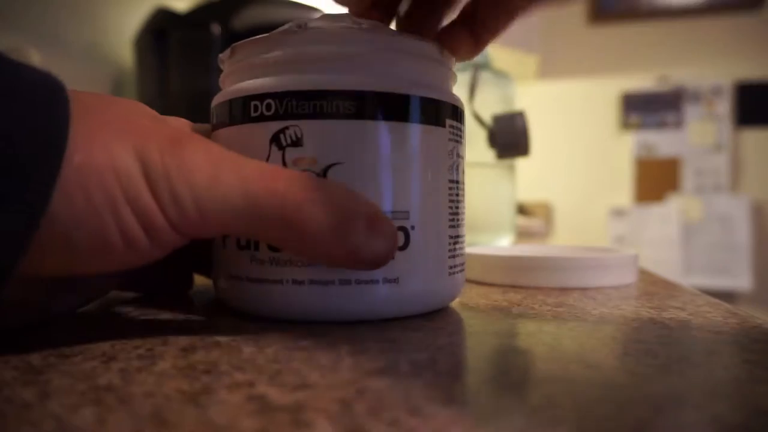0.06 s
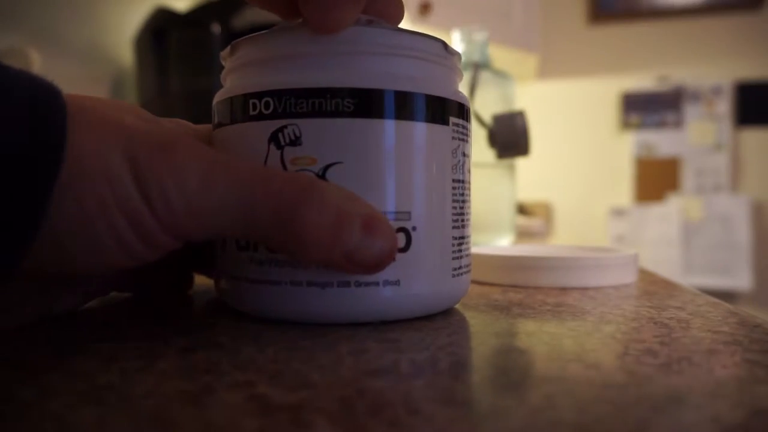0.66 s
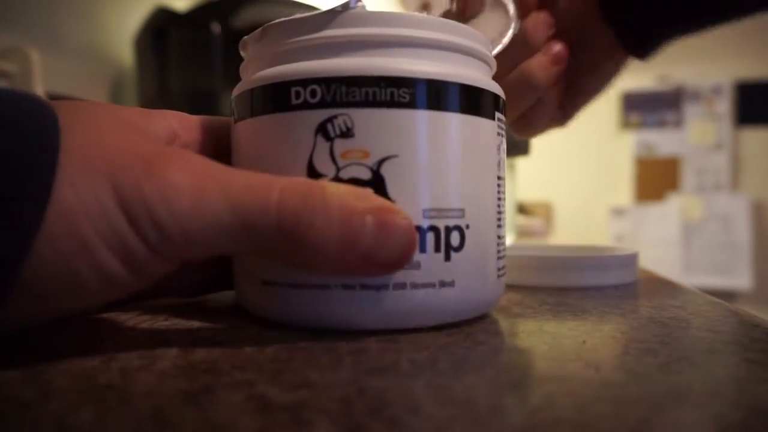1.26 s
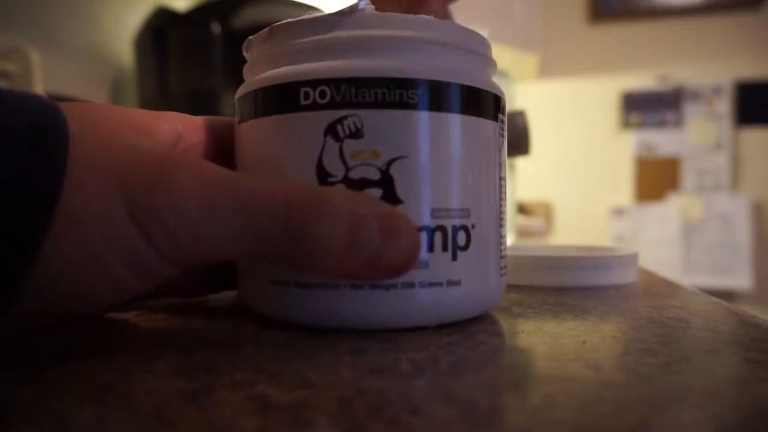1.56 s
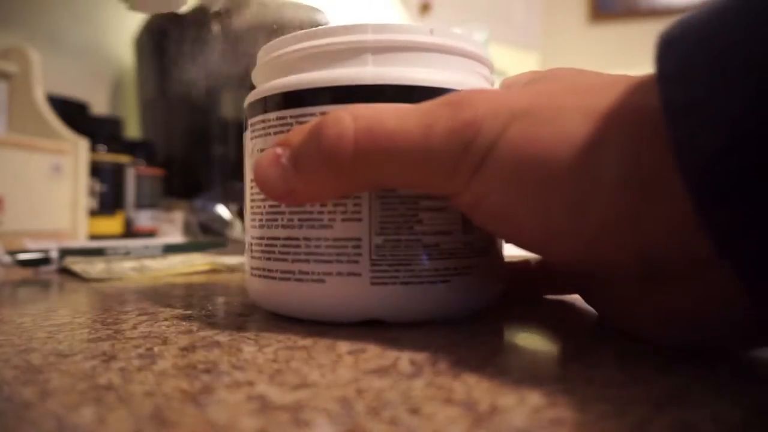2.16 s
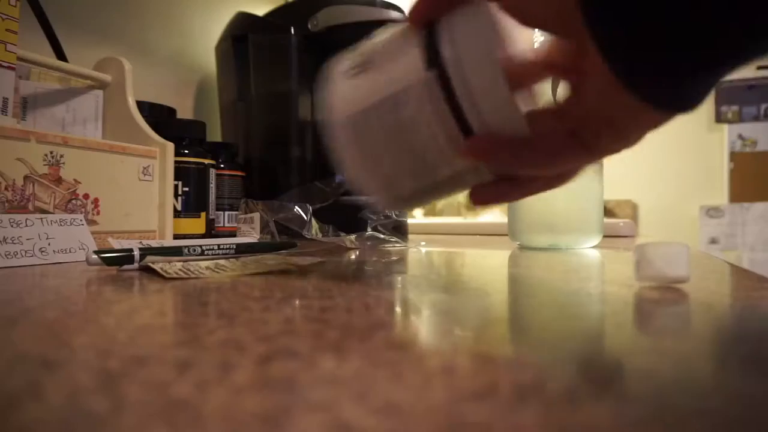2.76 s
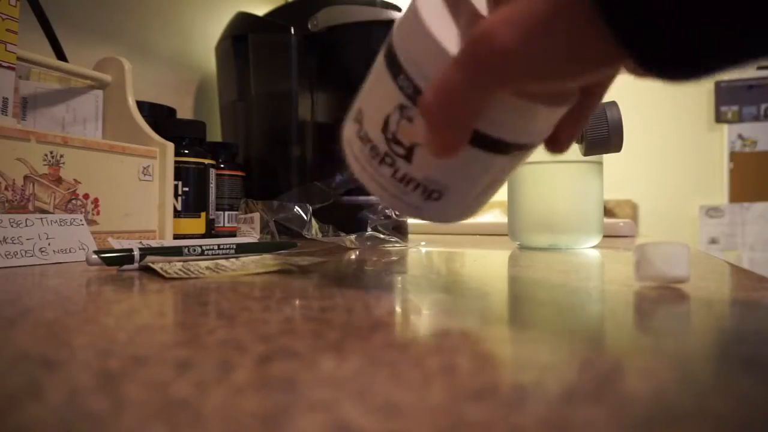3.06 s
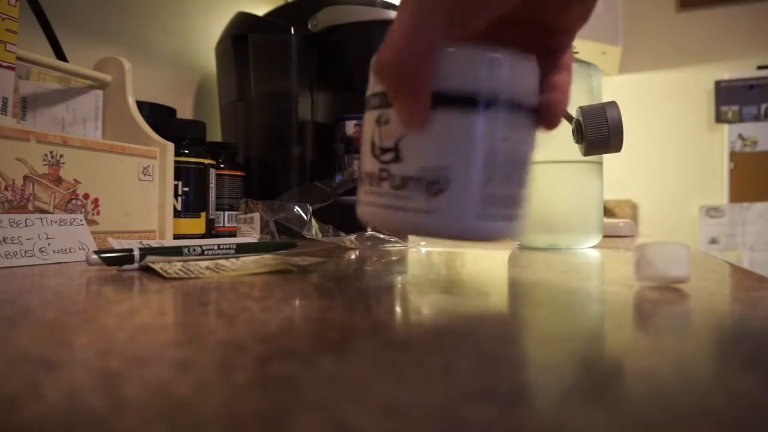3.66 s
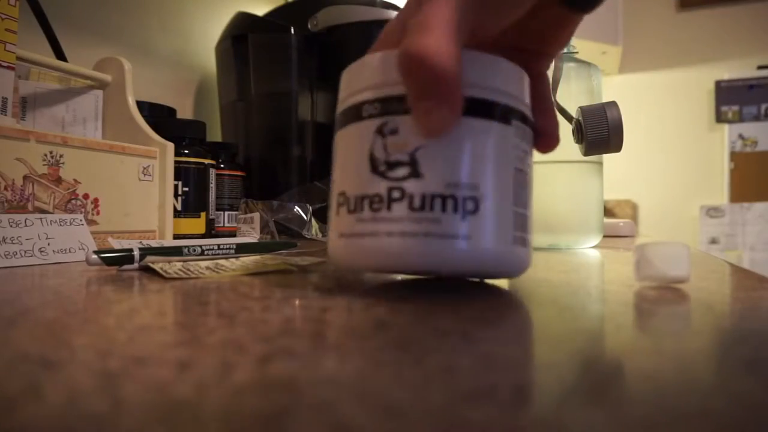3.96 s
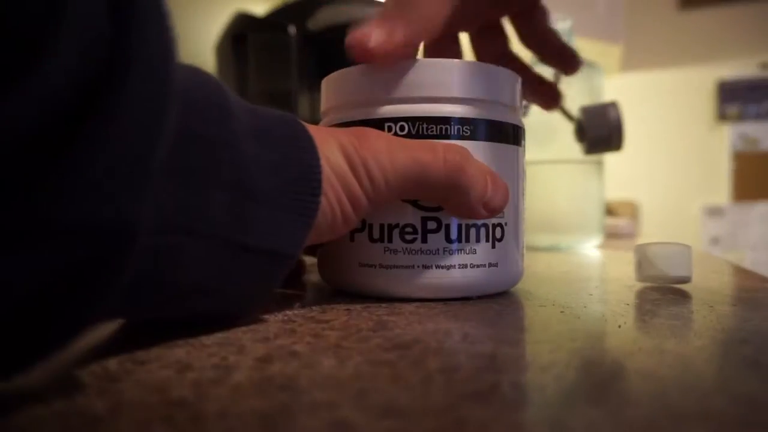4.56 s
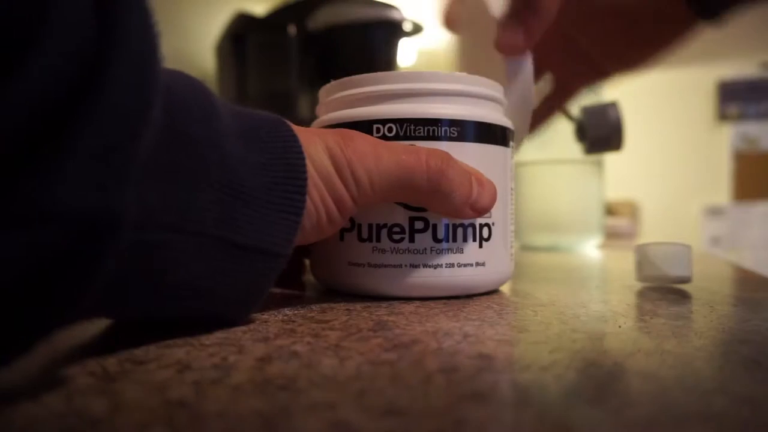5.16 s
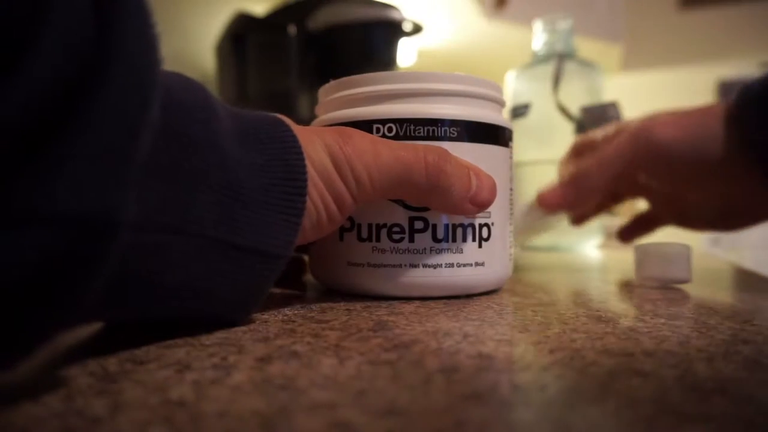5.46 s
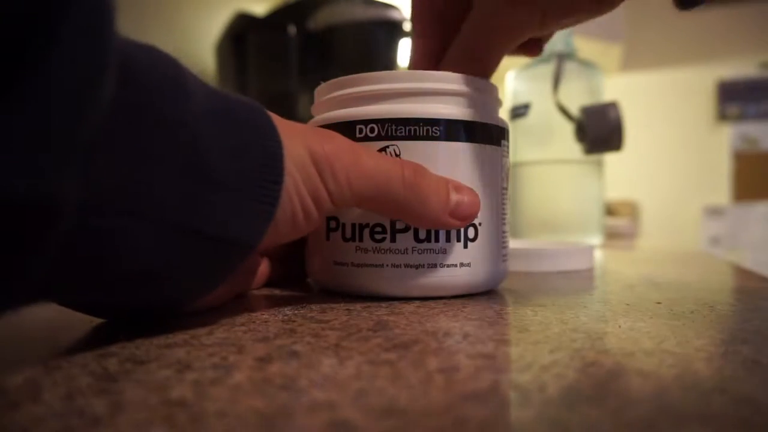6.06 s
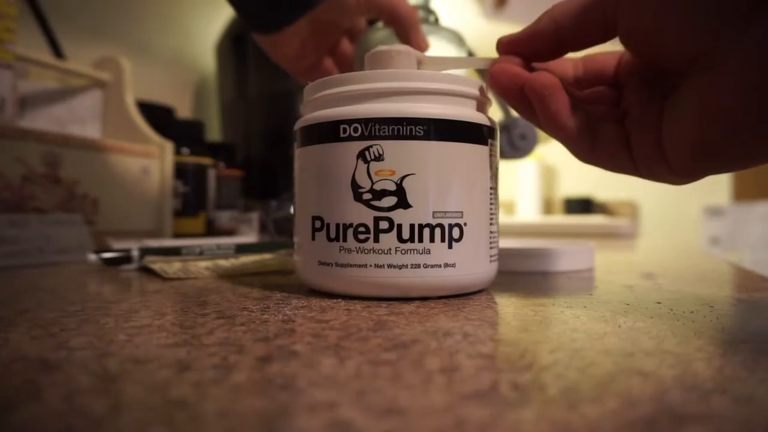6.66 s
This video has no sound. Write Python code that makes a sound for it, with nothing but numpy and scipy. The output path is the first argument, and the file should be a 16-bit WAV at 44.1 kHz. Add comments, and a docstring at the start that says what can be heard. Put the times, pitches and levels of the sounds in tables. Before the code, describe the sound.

Close handling of a plastic powder tub: seal peeling, swishing shakes, hollow thumps and a lid unscrewed and dropped, over a faint fridge hum.

```python
"""Opening a tub of powder

A plastic tub is handled close by on a kitchen counter while a fridge hums and a sleeve brushes faintly.
Its seal creaks by stick-slip, peels and pops off; the tub is shaken and set down; the lid is unscrewed
and clatters onto the counter; fingers dig for the scoop, and the tub thumps down twice. Impacts excite
damped modes of the plastic; tearing, rubbing and sliding powder are dense trains of tiny impulses."""
import sys
import numpy as np
from scipy import signal
from scipy.fft import rfft, irfft, next_fast_len
from scipy.io import wavfile

SR = 44100
rng = np.random.default_rng(int(sys.argv[2]) if len(sys.argv) > 2 else 0)


def dump(signal):
    """Clip the signal to [-1, 1] and save it as 16-bit WAV at the path in sys.argv[1]."""
    limited = np.clip(np.atleast_2d(signal).T, -1, 1)
    pcm = np.round(limited * 32767).astype(np.int16)
    wavfile.write(sys.argv[1], SR, pcm)


N = 304731
TIME = np.arange(N) / SR
BRIEF = TIME[:8192]  # time axis of one short sound

# Tones of the fridge motor. Each row: frequency in Hz, median rms level in dB.
MOTOR_TONES = [(59, -58.5), (118.6, -60.5), (355.5, -56.5), (558, -61.5)]
# Spectra of the fan and of brushed cloth. Each row: frequency in Hz, gain in dB.
FAN_SPECTRUM = [(25, -22), (80, 0), (170, -4.5), (300, 5), (720, -1), (950, -12.5), (1700, -22),
                (2500, -29.5), (16000, -37.5)]
CLOTH_SPECTRUM = [(400, -2.5), (1400, 8.5), (3500, -4), (16000, -14.5)]
# Movements of the sleeve. Each row: start in seconds, hold in seconds, level in dB.
SLEEVE_MOVES = [(.05, 1.4, -59.5), (4.15, 1.19, -61), (6.45, 0.54, -64)]

# Modes of the tub's hollow body and of its wall, before each blow scales them.
# Each row: frequency in Hz, 60 dB decay time in seconds, relative level in dB.
BODY_MODES = [(299, 0.029, 5.5), (358.5, 0.067, 3), (443, 0.021, 2.5), (570.4, 0.058, 0),
              (670.5, 0.056, -3.5), (798, 0.019, 5)]
WALL_MODES = [(650, .025, 9.8), (1042, 0.035, 19.5), (1218, 0.039, 11), (1337, 0.05, 9.2),
              (1670, 0.036, 6.4), (1983, 0.034, 6), (2340, 0.015, 1.6)]
# Spectra of a hard contact and of the plastic denting. Each row: frequency in Hz, gain in dB.
CRACK_SPECTRUM = [(500, 2), (1500, 6), (3700, 3), (6400, -5), (8000, -6.5), (16000, -7.5)]
DENT_SPECTRUM = [(100, -6), (700, 4), (2200, -5.5), (3500, -20), (16000, -42.5)]
# The tub lands. Each row: start in seconds, body, wall, crack and dent levels in dB, wall pitch factor,
# the base note's frequency in Hz, level in dB and swell in seconds, the counter's level in dB.
TUB_LANDINGS = [(0.073, -27.5, -25.5, -37, -27.5, 0.85, 144.5, -17.5, 0.0056, -39),
                (1.278, -32.5, -49, -56, -45.5, 1.14, 136.5, -33, .012, -49),
                (3.964, -22, -35, -32, -25.5, 1.85, 150, -20.5, 0.0064, -36),
                (4.1379, -18, -31, -36, -26.5, 1.7, 149, -22.5, 0.006, -25),
                (6.4335, -24.5, -32.5, -56, -39.5, 1.113, 170.2, -14, 0.0095, -26.5),
                (6.604, -27.5, -29.5, -64, -38, 1.1, 162.3, -13.5, 0.0087, -31)]
# Fingers tap. Each row: start in seconds, body, wall, crack and dent levels in dB, wall pitch factor.
FINGER_TAPS = [(.2613, -34.5, -27.5, -49, -39, 1.3), (2.0979, -23, -27, -29, -30, .82),
               (4.4832, -32.5, -37, -55, -44.5, 0.95), (4.5439, -20, -38, -37, -26, 1.15),
               (4.629, -34.5, -38.5, -42.5, -39, 0.95), (4.911, -25, -40, -43, -36, 0.99),
               (5.831, -40.5, -49, -55, -41.5, 1.05)]
# The thread jolts the tub. Each row: start in seconds, body and wall levels in dB, wall pitch factor.
THREAD_JOLTS = [(4.704, -31, -30, 1.12), (4.7249, -33, -34.5, 1.15), (4.7485, -27, -38, 0.99),
                (4.7665, -28.5, -33.5, 1.9), (5.0049, -29, -35, 1.54), (5.032, -33, -41, 1.13)]

# Runs of stick-slip under the fingers, one list a run.
# Each row: time in seconds, slips per second, relative level in dB, ringing frequency in Hz.
CREAK_RUNS = [
    [(.6015, 71.5, -25.5, 660), (.66, 104, -20, 900), (.735, 81, -15, 900)],
    [(.7522, 69, -17.5, 880), (.805, 146, -27, 970)],
    [(.8682, 72, -17, 1160), (.9, 97, -25, 1180), (.952, 46, -24.5, 1050)],
    [(5.739, 102, -40, 940), (5.82, 69, -43, 1010)],
]
# Spectra of a slip's tick, the drumming seal and tearing glue. Each row: frequency in Hz, gain in dB.
TICK_SPECTRUM = [(1000, 2.5), (5000, 3), (16000, -9)]
MEMBRANE_SPECTRUM = [(150, -11.5), (340, 3.5), (660, -2.5), (810, 13.5), (960, -2.5), (2600, -10.5),
                     (4000, -19.5)]
TEAR_SPECTRUM = [(1500, 3), (3500, 11), (11000, 2), (16000, -4.5)]
# Tugs at the seal. Each row: start in seconds, hold in seconds, level in dB.
SEAL_TUGS = [(.95, 0.097, -41.5), (1.06, 0.029, -40), (1.205, 0.047, -44.5), (1.37, 0.038, -48.5),
             (1.555, 0.16, -38.5), (1.855, 0.013, -43), (1.95, 0.065, -42.5), (2.122, 0.012, -41.5)]
# Sudden rips. Each row: start in seconds, hold in seconds, drumming and tearing levels in dB.
SEAL_RIPS = [(1.051, 0.0015, -33.5, -33), (1.191, 0.0026, -43, -44.5), (1.723, 0.004, -33.5, -34.5),
             (1.735, 0.0031, -31.5, -53), (2.6405, 0.00097, -38, -42), (2.651, 0.022, -36.5, -44.5)]
# The seal buckles. Each row: start in seconds, level in dB.
SEAL_BUCKLES = [(1.261, -45.5), (1.988, -37)]

# Strokes of the shaken tub. Each row: start in seconds, relative level in dB.
SHAKE_STROKES = [(2.796, -35), (2.86, -36.5), (2.943, -38.5), (3.02, -38.5), (3.09, -46), (3.214, -39),
                 (3.285, -43.5), (3.361, -40.5), (3.445, -39), (3.52, -37.5), (3.595, -40), (3.681, -39.5),
                 (3.753, -39.5), (3.822, -38), (3.893, -43.5)]
# Spectra of sliding powder and of its fast swish. Each row: frequency in Hz, gain in dB.
POWDER_SPECTRUM = [(1400, 0), (2000, 4.5), (3500, 2.5), (16000, 2.5)]
SWISH_SPECTRUM = [(3000, -19), (6600, -3), (16000, -9)]
# The scoop bumps the wall. Each row: start in seconds, relative level in dB, wall pitch factor.
SCOOP_BUMPS = [(3.041, -37, 1.58), (3.207, -46, 2.3)]

# Twists of the lid. Each row: start in seconds, hold in seconds, level in dB.
LID_TWISTS = [(4.43, 0.053, -45), (4.684, 0.012, -37.5), (4.71, 0.034, -31), (4.79, 0.032, -38),
              (4.952, 0.0055, -37.5), (4.986, 0.0067, -34), (5.185, 0.023, -47.5)]
# Spectra of the thread's catches and of its hiss. Each row: frequency in Hz, gain in dB.
THREAD_SPECTRUM = [(150, -16), (361, 12), (480, -0.5), (635, 8), (800, -9), (1200, 2.5), (1600, -8),
                   (2300, -2), (3200, -27)]
HISS_SPECTRUM = [(2000, 7.5), (3500, -1), (5100, 5.5), (8500, -5.5)]
# Modes of the lid. Each row: frequency in Hz, relative level in dB.
LID_MODES = [(1190, -3), (1860, 8), (2150, 1.5), (2900, 1), (3550, -4), (4900, 6), (5260, 6.5), (6100, 2.5),
             (6770, 3), (11600, -11)]
# Modes of its free rim. Each row: frequency in Hz, 60 dB decay time in seconds, relative level in dB.
RIM_MODES = [(1810, .09, -7.5), (2060, 0.043, -0.5), (2210, 0.026, -1)]
# The lid strikes the counter. Each row: start in seconds, level, treble gain and rim level in dB.
LID_CLACKS = [(5.5219, -26.5, -6.5, -26.5), (5.53, -36, -12, -34.5), (5.5838, -24, 4, -39),
              (5.592, -34.5, 4, -38), (5.645, -35, -2, -50), (5.6532, -30.5, 1, -48), (5.66, -35.5, 1, -47)]
# It skids between clacks. Each row: start and hold in seconds, level, treble gain and rim level in dB.
LID_SKIDS = [(5.524, 0.06, -41, 4, -37), (5.581, 0.086, -37.5, 7, -47)]

# Fingers push into the powder. Each row: start in seconds, hold in seconds, relative level in dB.
FINGER_DIGS = [(6.16, 0.017, -51.5), (6.2, 0.027, -44.5), (6.238, 0.0044, -35.5), (6.332, 0.0022, -45.5),
               (6.5, 0.34, -41.5)]
# Spectrum of pressed powder. Each row: frequency in Hz, gain in dB.
CRUNCH_SPECTRUM = [(300, 1), (1250, 4.5), (4500, -17), (16000, -26)]

# Spectra of the echo, of side relative to mid, and of left relative to right.
# Each row: frequency in Hz, gain in dB.
ECHO_SPECTRUM = [(60, -7), (350, -8), (650, -12.5), (1400, -14.5), (6000, -13)]
SIDE_SPECTRUM = [(100, -27), (600, -11.5), (1100, -3.5), (2000, -0.5), (16000, -0.5)]
LEFT_OVER_RIGHT = [(400, -0.1), (1100, -3.5), (14000, -1)]


def amp(db):
    """Amplitude grows tenfold for every 20 dB."""
    return 10 ** (np.asarray(db) / 20)


def unit(x):
    """Normalisation to an rms of 1."""
    return x / np.sqrt(np.mean(x ** 2))


def attack_unit(x):
    """Normalisation to an rms of 1 over the first 10 ms."""
    return x / np.sqrt(np.mean(x[:SR // 100] ** 2))


def add(track, s, sound):
    """Superposition: a short sound joins the track at s seconds."""
    i = int(s * SR)
    track[i:i + len(sound)] += sound[:N - i]


def colour(x, points):
    """Minimum-phase filtering: a folded cepstrum gives a causal response with the (Hz, dB) spectrum."""
    size = 2 * next_fast_len(len(x), real=True)
    hz, db = np.transpose(points)
    bins = np.maximum(np.arange(size // 2 + 1) * SR / size, 1)
    cepstrum = irfft(np.log(amp(np.interp(np.log(bins), np.log(hz), db))))
    cepstrum[1:size // 2] *= 2
    cepstrum[size // 2 + 1:] = 0
    return irfft(rfft(x, size) * np.exp(rfft(cepstrum)))[:len(x)]


def fade(t60, t=BRIEF):
    """Exponential decay by 60 dB in t60 seconds."""
    return np.exp(-np.log(1000) * t / t60)


def ring(modes, pitch=1, length=1, scatter=0.019):
    """Free vibration is a sum of damped modes; each blow lands elsewhere, so they shift a little."""
    out = 0
    for k, (hz, t60, db) in enumerate(modes):
        shifted_hz = hz * pitch * (1 + scatter * rng.standard_normal())
        out += amp(db) * (-1) ** k * fade(t60 * length) * np.sin(2 * np.pi * shifted_hz * BRIEF)
    return out


def pulse(points):
    """Impulse response: one dead pulse with a (Hz, dB) spectrum."""
    return attack_unit(colour(signal.unit_impulse(len(BRIEF)), points))


def grains(per_s, spread_db):
    """Shot noise: independent tiny clicks of unequal size."""
    size_db = spread_db * np.minimum(rng.exponential(size=N), 4)
    return (rng.random(N) < per_s / SR) * rng.standard_normal(N) * amp(size_db)


def gestures(rows, rise_db_per_s, sag_db_per_s, fall_db_per_s):
    """Incoherent powers add: each movement rises to its start time, sags while held, then falls."""
    power = np.zeros(N)
    for s, hold, db in rows:
        span = slice(*np.searchsorted(TIME, [s - 60 / rise_db_per_s, s + hold + 60 / fall_db_per_s]))
        age = TIME[span] - s
        drop_db = rise_db_per_s * np.maximum(-age, 0) + sag_db_per_s * np.maximum(age, 0)
        drop_db += fall_db_per_s * np.maximum(age - hold, 0)
        power[span] += amp(db - drop_db) ** 2
    return np.sqrt(power)


def bloom(swell_s):
    """A Rayleigh envelope peaks after the swell time and dies about as fast."""
    age = BRIEF / swell_s
    return age * np.exp((1 - age ** 2) / 2)


def fridge():
    """Slow modulation of level and phase makes the motor tones waver over a fan's broadband rush."""
    fan, other_fan = (colour(rng.standard_normal(N), FAN_SPECTRUM) for _ in range(2))
    mid, side = unit(fan), colour(other_fan, SIDE_SPECTRUM) / np.std(fan)
    hum, knots = 0, np.arange(0, TIME[-1] + 1, .3)
    for hz, db in MOTOR_TONES:
        size, phase = (np.interp(TIME, knots, rng.standard_normal(len(knots))) for _ in range(2))
        hum += amp(db + 2 * size) * np.sqrt(2) * np.sin(2 * np.pi * hz * TIME + 1.44 * phase)
    return amp(-47.5) * np.array([mid + side, mid - side]) + hum


def sleeve():
    """Friction between cloth fibres makes faint noise while the arm moves."""
    motion = gestures(SLEEVE_MOVES, rise_db_per_s=200, sag_db_per_s=1, fall_db_per_s=192)
    return motion * unit(colour(grains(per_s=8100, spread_db=3.5), CLOTH_SPECTRUM))


def crack(t60):
    """Hard contact is brief and therefore broadband: a snap of decaying noise."""
    return attack_unit(colour(rng.standard_normal(len(BRIEF)) * fade(t60), CRACK_SPECTRUM))


def blow(body_db, wall_db, crack_db, dent_db, body_pitch=1, wall_pitch=1):
    """An impact dents the plastic and excites its modes; a soft one reaches only the low wall modes."""
    body = amp(body_db) * attack_unit(ring(BODY_MODES, body_pitch, 1 / body_pitch))
    soft_hz, hard_hz, crack_db_per_octave = 1820, 7900, 14
    reach_hz = np.clip(hard_hz * 2 ** ((crack_db - wall_db) / crack_db_per_octave), soft_hz, hard_hz)
    contact = signal.butter(2, reach_hz, fs=SR, output="sos")
    wall = attack_unit(signal.sosfilt(contact, ring(WALL_MODES, wall_pitch, .75 / wall_pitch)))
    return body + amp(wall_db) * wall + amp(dent_db) * pulse(DENT_SPECTRUM) + amp(crack_db) * crack(0.031)


def knocks(contacts=4, rebound_s=0.0063):
    """Inelastic impacts: the tub lands in ever weaker, lower rebounds; fingers and thread knock it."""
    out = np.zeros(N)
    for s, body_db, wall_db, crack_db, dent_db, wall_pitch, *_ in TUB_LANDINGS:
        for k in range(contacts):
            loss_db, pitch = 6.5 * k, 0.83 ** k
            levels = body_db - loss_db, wall_db - loss_db, crack_db - 2 * k, dent_db - loss_db
            add(out, s + k * rebound_s, blow(*levels, pitch, pitch * wall_pitch))
    for s, *levels, pitch in FINGER_TAPS:
        add(out, s, blow(*levels, wall_pitch=pitch))
    for s, body_db, wall_db, pitch in THREAD_JOLTS:
        add(out, s, blow(body_db, wall_db, crack_db=wall_db - 8, dent_db=wall_db - 2.5, wall_pitch=pitch))
    return out


def thumps(counter_hz=85.4, counter_swell_s=0.01):
    """Delayed loading: the powder lands after the tub, so the base note swells as the counter booms."""
    out = np.zeros(N)
    for s, *_, hz, base_db, swell_s, counter_db in TUB_LANDINGS:
        note = np.sin(2 * np.pi * hz * BRIEF)
        # loose powder pushes back on one half of each swing, adding even harmonics
        note = note + .5 * np.abs(note) - 1 / np.pi
        add(out, s, amp(base_db) * bloom(swell_s) * note)
        add(out, s, amp(counter_db) * bloom(counter_swell_s) * np.sin(2 * np.pi * counter_hz * BRIEF))
    return out


def creaks():
    """Stick-slip: each slip of the plastic gives a dead knock, higher under tension, and a crisp tick."""
    out = np.zeros(N)
    tick = amp(-28) * pulse(TICK_SPECTRUM)
    for run in CREAK_RUNS:
        times, *columns = np.transpose(run)
        s = times[0]
        while s < times[-1]:
            rate, db, hz = (np.interp(s, times, column) for column in columns)
            modes = [(hz, .009, 0), (1.94 * hz, .006, -8), (1.62 * hz, .005, -13), (0.4 * hz, .011, -4.5)]
            knock = ring(modes, scatter=0.14)
            base_and_ping = ring([(147, 0.034, -17.5), (4700, 0.0086, -26)], scatter=0.074)
            add(out, s, amp(db - 2.5) * (knock + base_and_ping + tick))
            s += (1 + .008 * rng.standard_normal()) / rate
    return out


def seal():
    """Fracture: snapping glue threads hiss and drive the seal as a membrane, brightest when it rips."""
    snaps = grains(per_s=4500, spread_db=2.2)
    pull = gestures(SEAL_TUGS, rise_db_per_s=636, sag_db_per_s=70, fall_db_per_s=144)
    s, hold, *levels = np.transpose(SEAL_RIPS)
    drum, tear = (gestures(zip(s, hold, db), rise_db_per_s=9000, sag_db_per_s=0, fall_db_per_s=1106)
                  for db in levels)
    drumming = (pull + drum) * unit(colour(snaps, MEMBRANE_SPECTRUM))
    tearing = (amp(-12) * pull + tear) * unit(colour(snaps, TEAR_SPECTRUM))
    return drumming + tearing


def buckles():
    """Buckling: the stiff seal gives way suddenly and sends a dry tick through the tub's wall."""
    out = np.zeros(N)
    for s, db in SEAL_BUCKLES:
        wall = attack_unit(ring(WALL_MODES, pitch=1.07, length=0.51, scatter=0.094))
        add(out, s, amp(db) * (wall + amp(-8) * crack(0.062)))
    return out


def shaking(shaking_starts_s=2.783, hold_s=.029):
    """Granular flow: each stroke sweeps powder along the wall; fast strokes add a bright swish."""
    s, db = np.transpose(SHAKE_STROKES)
    holds, swish_db = np.full(len(s), hold_s), 2 * db - db.max() - 2
    sweep, swish = (gestures(zip(s, holds, level), rise_db_per_s=429, sag_db_per_s=0, fall_db_per_s=315)
                    for level in (db, swish_db))
    sliding = sweep * unit(colour(grains(per_s=16000, spread_db=-1), POWDER_SPECTRUM))
    swishing = swish * unit(colour(grains(per_s=16000, spread_db=-4), SWISH_SPECTRUM))
    return amp(-1.6) * (sliding + swishing) * (TIME > shaking_starts_s)  # the shaking begins abruptly


def scoop():
    """Damping: the scoop strikes the wall from inside, and the powder cuts the ringing short."""
    out = np.zeros(N)
    for s, db, pitch in SCOOP_BUMPS:
        wall = attack_unit(ring(WALL_MODES, pitch, length=0.41))
        add(out, s, amp(db) * (amp(-1) * wall + amp(2) * crack(0.033)))
    return out


def thread():
    """Friction: the dusty thread catches, shaking lid and enclosed air; a faster turn hisses more."""
    catches = grains(per_s=2500, spread_db=3)
    speed = gestures(LID_TWISTS, rise_db_per_s=750, sag_db_per_s=39, fall_db_per_s=189)
    dust = unit(catches) + rng.standard_normal(N)
    hiss = amp(0.5) * (speed / speed.max()) ** 0.49 * unit(colour(dust, HISS_SPECTRUM))
    return speed * (unit(colour(catches, THREAD_SPECTRUM)) + hiss)


def squeak(start_s=5.022, hz=635, db=-25.5):
    """Friction excites one mode: the last turn grabs, and the lid sings briefly as it comes free."""
    out = np.zeros(N)
    add(out, start_s, amp(db) * bloom(swell_s=.012) * np.sin(2 * np.pi * hz * BRIEF))
    return out


def lid(crossover_hz=2500):
    """Impact and sliding friction ring the fallen lid and its rim; the high modes die soonest."""
    out = np.zeros(N)
    modes = [(hz, 0.03 * (2000 / hz) ** 0.49, db) for hz, db in LID_MODES]
    rim = ring(RIM_MODES, scatter=.002)
    catches = grains(per_s=9000, spread_db=.6)
    chatter = unit(signal.fftconvolve(catches, ring(modes, scatter=0.0062))[:N])
    chatter += amp(1) * unit(colour(catches, CRACK_SPECTRUM))
    bass = unit(signal.sosfilt(signal.butter(4, crossover_hz, fs=SR, output="sos"), chatter))
    treble = unit(signal.sosfilt(signal.butter(3, crossover_hz, "high", fs=SR, output="sos"), chatter))
    singing = unit(signal.fftconvolve(catches, rim)[:N])
    for s, db, treble_db, rim_db in LID_CLACKS:
        clack = attack_unit(ring(modes, scatter=0.012)) + amp(1) * crack(0.019)
        clack = attack_unit(colour(clack, [(1000, 0), (8000, treble_db), (16000, treble_db - 6)]))
        rim_note = attack_unit(ring(RIM_MODES, length=0.37, scatter=0.0036))
        add(out, s, amp(db) * clack + amp(rim_db) * rim_note)
    for s, hold, db, treble_db, rim_db in LID_SKIDS:
        force = gestures([(s, hold, 0)], rise_db_per_s=8700, sag_db_per_s=57, fall_db_per_s=1097)
        scrape = (bass + amp(treble_db) * treble) / np.hypot(1, amp(treble_db))
        out += force * (amp(db) * scrape + amp(rim_db) * singing)
    return out


def digging():
    """Compaction: powder crunches dully round the fingers and the scoop."""
    push = gestures(FINGER_DIGS, rise_db_per_s=554, sag_db_per_s=20, fall_db_per_s=408)
    return amp(-5) * push * unit(colour(grains(per_s=3200, spread_db=0), CRUNCH_SPECTRUM))


def reflections(x, t60, delay_s, spectrum):
    """Diffuse reflection: convolution with noise that builds up around the delay and dies away."""
    t = TIME[:SR // 2]
    echo = rng.standard_normal(len(t)) * fade(t60, t) * np.clip(t / delay_s - .5, 0, 1)
    response = colour(echo / np.sqrt(np.sum(echo ** 2)), spectrum)
    return signal.fftconvolve(x, response)[:N]


def kitchen(x, echo_db, motion_hz=1.3):
    """Scattering from moving hands sends different treble to each side; the room adds a short echo."""
    mid_echo, side_echo = (amp(echo_db) * reflections(x, 0.44, 0.0047, ECHO_SPECTRUM) for _ in range(2))
    paths = [reflections(x, t60=.02, delay_s=.0002, spectrum=SIDE_SPECTRUM) for _ in range(2)]
    turn = 2 * np.pi * motion_hz * TIME  # the paths change as the hands and the tub move
    side = amp(-2) * (np.cos(turn) * paths[0] + np.sin(turn) * paths[1])
    side += colour(side_echo, SIDE_SPECTRUM)
    return np.array([colour(x + mid_echo + sign * side, [(hz, sign * db / 2) for hz, db in LEFT_OVER_RIGHT])
                     for sign in (1, -1)])


def scene():
    """Superposition of fridge, echoing tub and the lid's clatter, which stops dead with almost no echo."""
    tub = knocks() + scoop() + thumps() + creaks() + seal() + buckles()
    tub = tub + shaking() + digging() + thread() + squeak() + sleeve()
    return kitchen(tub, echo_db=2.5) + kitchen(lid(), echo_db=-42) + fridge()


def record(dry, low_hz=36, top_hz=16000):
    """Band limiting removes the deepest bass and the highest treble."""
    dry = signal.sosfilt(signal.butter(2, low_hz, "high", fs=SR, output="sos"), dry)
    return signal.sosfilt(signal.ellip(10, .2, 80, top_hz, fs=SR, output="sos"), dry)


dry = scene()
out = record(dry)
dump(out)
```